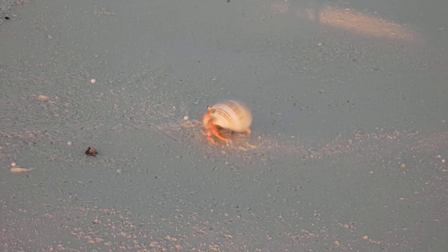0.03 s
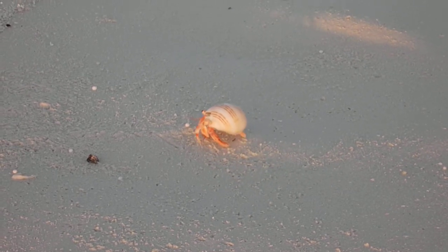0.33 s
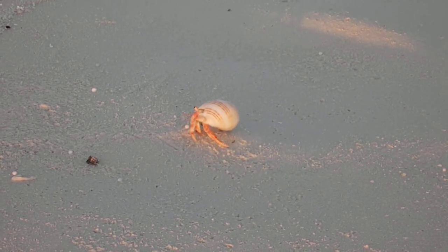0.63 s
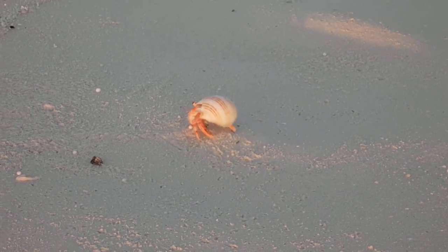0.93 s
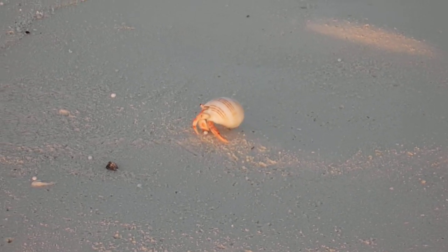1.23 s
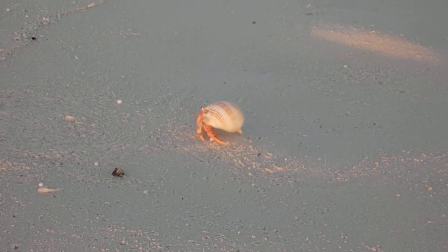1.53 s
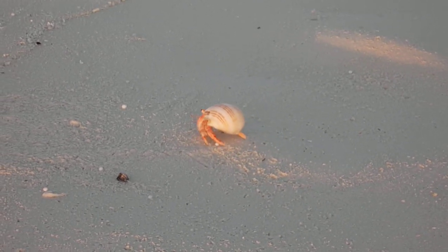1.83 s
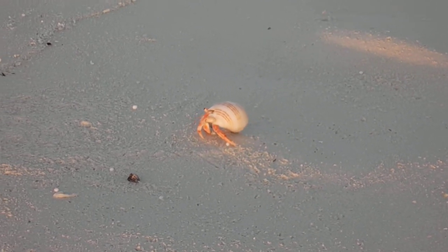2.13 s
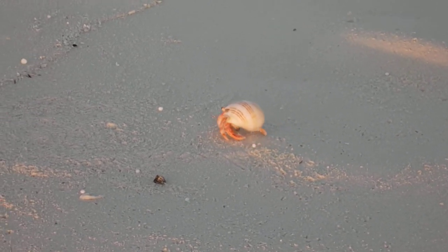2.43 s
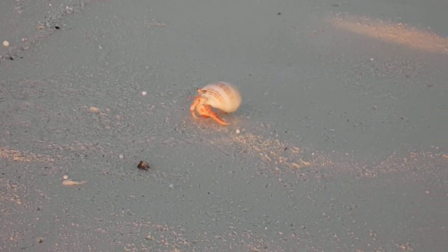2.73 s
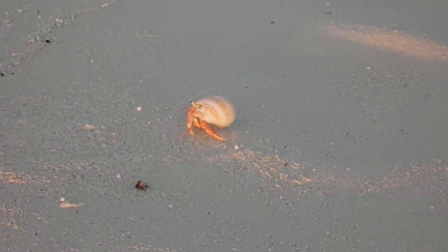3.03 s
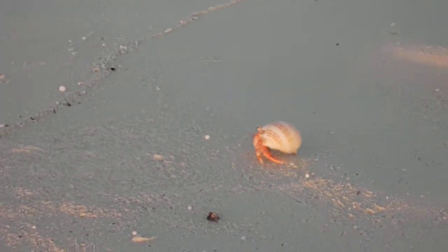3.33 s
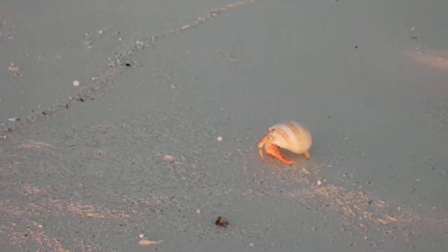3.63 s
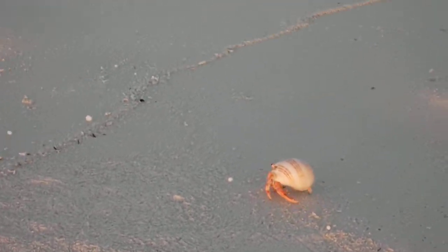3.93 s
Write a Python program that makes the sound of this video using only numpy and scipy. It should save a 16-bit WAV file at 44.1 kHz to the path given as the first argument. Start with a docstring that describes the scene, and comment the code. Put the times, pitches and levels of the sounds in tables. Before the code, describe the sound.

Low, uneven gusts of wind blow right on the microphone while small waves wash softly over sand. Close handling bumps come early, and a stronger gust arrives with a tick and a knock toward the end.

```python
"""Gentle surf on a beach: small waves roar dully, foam washes over the sand and bubbles burst on it.
The microphone is on a hand-held camera, out in the wind, whose eddies rumble and flutter right on it.
Closest of all, the camera takes a few bumps and knocks, ticks twice and is brushed by the hand.
Its electronics add faint hiss and a thin whine. Nearly mono, the left channel's treble a hair late."""
import sys
import numpy as np
from scipy import signal
from scipy.fft import rfft, irfft, next_fast_len
from scipy.io import wavfile
from scipy.ndimage import uniform_filter1d, map_coordinates

SR = 44100
rng = np.random.default_rng(int(sys.argv[2]) if len(sys.argv) > 2 else 0)


def generate_wav(sig):
    """Save sig (samples, or channels by samples) to the path in sys.argv[1] as 16-bit PCM at SR."""
    pcm = np.round(np.clip(np.atleast_2d(sig).T, -1, 1) * 32767).astype(np.int16)
    wavfile.write(sys.argv[1], SR, pcm)


N = 176400
T = np.arange(N) / SR

# The wash of the waves. Each row: time in seconds, relative foam level in dB, relative roar level in dB.
SURF_LEVELS = [(0, -38.5, -39.5), (.17, -37.5, -36), (.27, -38.5, -38.5), (.39, -36.5, -37.5),
               (.54, -40, -41.5), (.92, -42, -42), (1.02, -39, -41.5), (1.1, -38.5, -40),
               (1.22, -42, -42.5), (1.54, -38.5, -38.5), (1.64, -38.5, -40.5), (1.77, -36.5, -37.5),
               (1.99, -38, -37.5), (2.12, -36, -37), (2.5, -39, -38), (2.75, -40.5, -41.5),
               (3.2, -41.5, -39.5), (3.75, -41.5, -43), (4, -38.5, -38)]


def amp(db):
    """Gain from dB."""
    return 10 ** (np.asarray(db) / 20)


def unit(x):
    """x at rms 1."""
    return x / np.sqrt(np.mean(x ** 2) + 1e-20)


def along(points, hz):
    """The value at hz between (Hz, value) points, on a log frequency axis."""
    point_hz, values = np.transpose(points)
    return np.interp(np.log(hz + 1), np.log(point_hz + 1), values)


def curves(rows):
    """One value per sample for each column after the time."""
    times, *columns = np.transpose(rows)
    return [np.interp(T, times, column) for column in columns]


def swells(rows):
    """A sum of bell-shaped envelopes, one for each (middle s, dB, half length s)."""
    return sum(amp(db) * np.exp(-((T - middle) / half) ** 2) for middle, db, half in rows)


def wobble(rate):
    """A smooth random curve, rate knots a second."""
    return map_coordinates(rng.standard_normal(1024), [T * rate], mode="wrap")


def filtered(x, response):
    """x through a filter whose gain is response(hz)."""
    size = next_fast_len(N + SR // 2)
    hz = np.fft.rfftfreq(size, 1 / SR)
    return irfft(rfft(x, size) * response(hz), size)[..., :N]


def dull(x, top_hz):
    """x with everything above top_hz falling away."""
    return filtered(x, lambda hz: np.exp(-.5 * (hz / top_hz) ** 4))


def noise(spectrum):
    """Noise of rms 1, coloured by (Hz, dB) points and rolling off above the last."""
    top_hz = spectrum[-1][0]
    colour = lambda hz: amp(along(spectrum, hz)) / np.maximum(hz / top_hz, 1) ** 2
    return unit(filtered(rng.standard_normal(N), colour))


def patchy(x, depth_db):
    """x with patches of random gain in time and frequency, at rms 1."""
    cells = signal.stft(x, nperseg=512)[2]
    patches = uniform_filter1d(rng.standard_normal(cells.shape), size=7, axis=0)
    patches = unit(uniform_filter1d(patches, size=14, axis=1))
    return unit(signal.istft(cells * amp(depth_db * patches), nperseg=512)[1][:N])


def even(x, span_s):
    """x at rms 1, its chance swells slower than span_s smoothed out."""
    power = np.abs(signal.hilbert(x)) ** 2
    slow_power = np.abs(uniform_filter1d(power, size=max(int(span_s * SR), 1)))
    return unit(x / np.sqrt(slow_power + 1e-6))


def electronics():
    """The camera's noise floor: steady hiss and a cluster of thin tones."""
    # The whine. Each row: frequency in Hz, rms level in dB.
    tones = [(10714.5, -75), (10796, -77), (10633, -87), (10878, -88), (10959, -87)]
    # Colour of the hiss. Each row: frequency in Hz, relative density in dB.
    hiss_spectrum = [(1000, 5), (5800, 5), (7200, 1), (8100, 4), (8850, 8.5), (9600, 0.5), (11000, -4),
                     (13000, -8), (15700, -13)]
    whine = sum(amp(db) * np.sqrt(2) * np.sin(2 * np.pi * (hz * T + rng.random())) for hz, db in tones)
    return whine + amp(-57) * noise(hiss_spectrum)


def bumps():
    """Soft bumps on the camera ring, heavily damped, and its body dulls them."""
    # Each row: start in seconds, relative level in dB, pitch in Hz, seconds to fall 60 dB.
    hits = [(.972, -21, 170, 0.0083), (0.9842, -15.5, 202, 0.014), (1.184, -16, 172, 0.019),
            (1.63, -15, 121, 0.039), (1.638, -13.5, 350, 0.013), (3.5, -16.5, 72.6, 0.28),
            (3.582, -14, 225, 0.028)]
    attack_s = 0.00094
    out = np.zeros(N)
    for start, db, hz, t60 in hits:
        age = np.maximum(T - start, 0)
        envelope = 2 * amp(db - 60 * age / t60) * (1 - np.exp(-age / attack_s))
        out -= envelope * np.sin(2 * np.pi * hz * age)
    return dull(out, top_hz=800)


def knocks():
    """Firmer knocks on the camera: the push builds up, lets go and springs back."""
    # Each row: moment of release in seconds, level in dB before dulling, treble cutoff in Hz.
    hits = [(0.9808, -2.5, 920), (1.0187, -11, 560), (3.5851, -6.5, 342)]
    press_s, rebound_s, rebound_share = 0.0015, 0.0013, 0.36
    out = np.zeros(N)
    for release, db, top_hz in hits:
        gap = np.abs(T - release)
        press = -np.exp(-gap / press_s)
        rebound = rebound_share * np.exp(-gap / rebound_s)
        out += amp(db) * dull(np.where(T < release, press, rebound), top_hz)
    return out


def sinking_rumble():
    """After the first knock a gust eddy's narrow rumble sinks in pitch and fades."""
    start_s, length_s, glide_s = .98, 0.17, .045
    from_hz, to_hz = 460, 96
    age = np.maximum(T - start_s, 0)
    hz = to_hz + (from_hz - to_hz) * np.exp(-age / glide_s)
    phase = 2 * np.pi * np.cumsum(hz) / SR + 0.51 * wobble(rate=50)  # jitter roughens the tone
    arch = np.sin(np.pi * np.minimum(age / length_s, 1))
    return amp(-27.5 + 2.8 * wobble(rate=66)) * arch * np.sin(phase)


def ticks():
    """The camera ticks twice: a sudden edge that dies at once."""
    # Each row: start in seconds, peak in dB.
    edges = [(3.5143, -11), (3.5787, -22)]
    decay_s = 0.0013
    return -sum(amp(db) * (T >= start) * np.exp(-np.abs(T - start) / decay_s) for start, db in edges)


def brushes():
    """The hand slides lightly over the camera in two short hisses."""
    # Each row: middle in seconds, level in dB, half length in seconds.
    strokes = [(3.611, -45, 0.015), (3.66, -54, 0.022)]
    # Colour of rubbing skin. Each row: frequency in Hz, relative density in dB.
    skin_spectrum = [(1000, -11), (3000, 15), (7000, 0), (9200, -4), (11200, 3), (13000, -22), (16000, -28)]
    return swells(strokes) * noise(skin_spectrum)


def wind():
    """Large eddies rumble and buffet on the microphone; small ones flutter and puff in the gusts."""
    # Strength and roughness of the air flow. Each row: time in seconds, relative level in dB.
    strength = [(0, -14.5), (.04, -10.5), (.13, -20.5), (.24, -23), (.38, -14.5), (.47, -18), (.56, -11),
                (.63, -18.5), (.76, -29), (.86, -22.5), (.95, -19.5), (1.1, -15), (1.3, -32), (1.48, -24.5),
                (1.57, -17), (1.64, -22.5), (1.74, -15.5), (1.85, -25), (2.02, -22.5), (2.1, -19),
                (2.2, -21.5), (2.28, -27.5), (2.62, -25.5), (2.76, -16.5), (2.88, -15.5), (3.02, -12),
                (3.11, -18.5), (3.2, -14), (3.3, -22.5), (3.42, -18.5), (3.53, -8), (3.63, -14.5),
                (3.7, -18), (3.79, -19), (3.88, -16), (4, -20)]
    roughness = [(0, -46), (.04, -33.5), (.2, -40.5), (.4, -44), (.48, -45), (.54, -31), (.62, -35),
                 (.67, -42.5), (.9, -40.5), (.97, -24.5), (1.03, -29.5), (1.12, -40), (1.18, -30),
                 (1.22, -49.5), (1.55, -42.5), (1.77, -33.5), (1.86, -46), (2.65, -49), (2.76, -37.5),
                 (2.88, -45), (3, -29), (3.12, -31.5), (3.2, -36), (3.26, -26.5), (3.41, -39.5),
                 (3.53, -22), (3.62, -33.5), (3.82, -37), (4, -35)]
    # Low buffets and sharp puffs. Each row: middle in seconds, level in dB, half length in seconds.
    buffet_swells = [(.375, -21.5, 0.034), (.57, -29, 0.031), (1.73, -24, 0.028), (3.08, -18.5, 0.04),
                     (3.2, -25, 0.025), (3.69, -24.5, 0.022)]
    puff_swells = [(2.752, -30, 0.0091), (3.07, -36, 0.033), (3.52, -23.5, 0.022)]
    # Colours of the four layers. Each row: frequency in Hz, relative density in dB.
    rumble_spectrum = [(3, -8), (8, 3), (14, 6), (22, 2), (33, -2), (50, -9), (72, -13.5), (110, -24),
                       (200, -41), (400, -70)]
    flutter_spectrum = [(40, -17), (80, -0.5), (125, 3), (230, -5), (350, -12), (550, -20.5), (1000, -46),
                        (3000, -78)]
    buffet_spectrum = [(10, -8), (35, -1), (70, 1), (110, -12.5), (200, -27.5)]
    puff_spectrum = [(80, 3.5), (220, 5.5), (380, 5.5), (550, -7), (900, -16), (2000, -66)]
    trim_db = 1
    rumble_db = curves(strength)[0] + trim_db
    rumble = amp(rumble_db) * even(noise(rumble_spectrum), span_s=0.104)
    flutter_db = curves(roughness)[0] + trim_db + 2.6 * wobble(rate=66)
    flutter = amp(flutter_db) * even(noise(flutter_spectrum), span_s=0.066)
    buffets = swells(buffet_swells) * even(noise(buffet_spectrum), span_s=0.031)
    puffs = swells(puff_swells) * even(noise(puff_spectrum), span_s=0.015)
    return rumble + buffets + flutter + puffs


def bubbles():
    """Bubbles burst on the wet sand: a few clear pings, and many faint ones as loud as the foam allows."""
    # The clear pops. Each row: start in seconds, peak in dB, pitch in Hz.
    clear = [(.051, -31, 3830), (.465, -38, 3900), (1.82, -38, 4200), (2.087, -34, 3600),
             (2.198, -37, 4700), (2.313, -34, 5400), (2.414, -39, 4200), (3.309, -34, 4500)]
    faint_per_s, lowest_hz, ring_cycles = 64, 3240, 13.4  # a pop falls 60 dB in ring_cycles
    foam_db, _ = curves(SURF_LEVELS)
    when, octaves, faintness = rng.random((int(faint_per_s * N / SR), 3)).T
    starts = when * T[-1]
    peaks_db = np.interp(starts, T, foam_db) - 2 - 11 * faintness
    faint = zip(starts, peaks_db, lowest_hz * 2 ** octaves)
    out = np.zeros(N + SR)
    age = T[:SR // 100]
    for start, db, hz in [*clear, *faint]:
        ping = amp(db - 60 * age * hz / ring_cycles) * np.sin(2 * np.pi * hz * age)
        out[int(start * SR):][:len(ping)] += ping
    return out[:N]


def surf():
    """Small waves roar dully and their foam washes over the sand; a faint part of the wash is wide."""
    # Colours of the three layers. Each row: frequency in Hz, relative density in dB.
    foam_spectrum = [(600, -59), (1200, -5.5), (1550, -1), (2050, 1.5), (2450, -2), (3000, -11.5),
                     (3400, -17), (3800, -17.5), (4300, -25), (5000, -29.5), (6000, -28.5), (7500, -37),
                     (8800, -39), (10000, -41), (15000, -64)]
    roar_spectrum = [(40, -10), (120, -1.5), (250, 1.5), (450, 0.3), (800, -0.5), (1050, -3), (1300, -13),
                     (2000, -18), (4000, -31.5)]
    wide_spectrum = [(100, -50), (300, -36), (550, -35), (950, -38.5), (2050, 6), (3000, 3), (4200, -6),
                     (6000, -5), (7500, -10), (8800, -13), (11000, -12), (15700, -19)]
    foam_trim_db, roar_trim_db, wide_db = 0.5, 3, -65.5
    foam_db, roar_db = curves(SURF_LEVELS)
    foam_gain = amp(foam_db + foam_trim_db + 0.31 * wobble(rate=7.7))
    foam = foam_gain * patchy(noise(foam_spectrum), depth_db=1.0)
    roar_gain = amp(roar_db + roar_trim_db + 0.37 * wobble(rate=6.4))
    roar = roar_gain * patchy(noise(roar_spectrum), depth_db=1.5)
    wide = amp(wide_db + .5 * (foam_db - foam_db.mean())) * noise(wide_spectrum)
    return foam + roar + wide * np.array([[1], [-1]])  # opposite polarity left and right


def scene():
    """The beach as it reaches the microphone, plus the camera's own noises and one sinking gust."""
    beach = wind() + surf() + bubbles()
    close_sounds = bumps() + knocks() + ticks() + brushes() + sinking_rumble()
    return beach + close_sounds + electronics()


def record(dry):
    """The camera's stereo microphone: the left channel trails slightly and the top treble is cut."""
    # How far left trails right. Each row: frequency in Hz, phase lag in radians.
    left_lag = [(60, 0.00069), (300, 0.0015), (800, 0.012), (1350, 0.01), (2000, 0.25), (4200, 0.42),
                (6000, 0.76), (8800, 1.24), (14000, 2.1)]
    top_hz = 15750
    lag = lambda hz: np.exp(.5j * along(left_lag, hz) * np.array([[-1], [1]]))
    return filtered(dry, lambda hz: lag(hz) * (hz < top_hz))


dry = scene()
out = record(dry)
generate_wav(out)
```